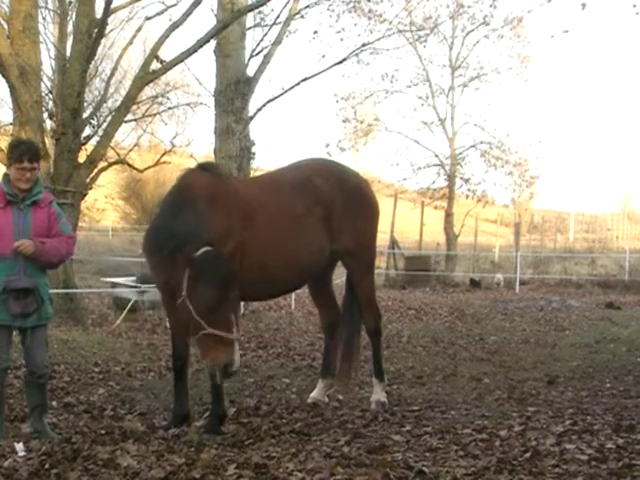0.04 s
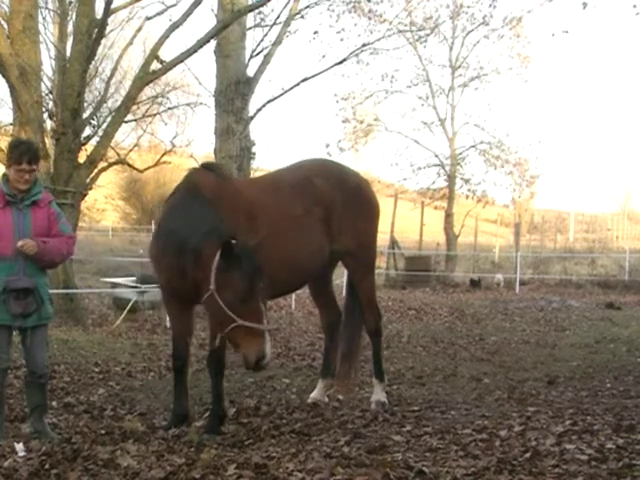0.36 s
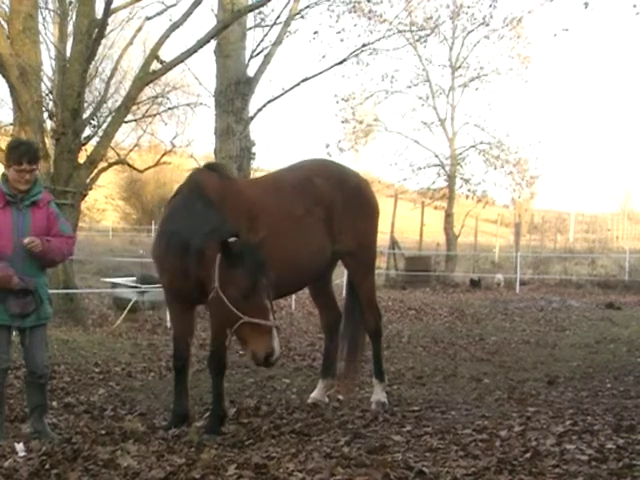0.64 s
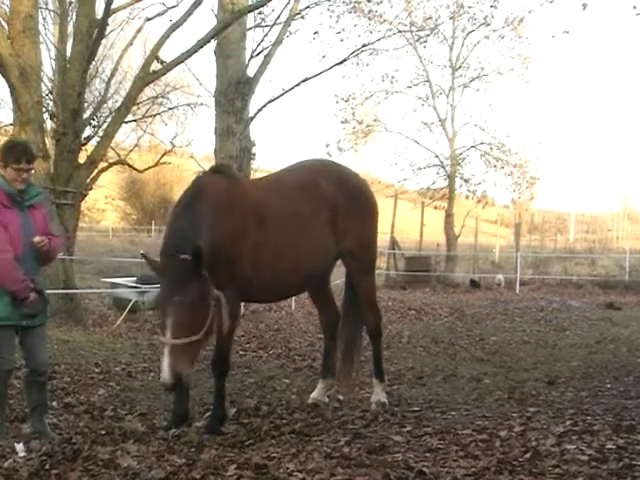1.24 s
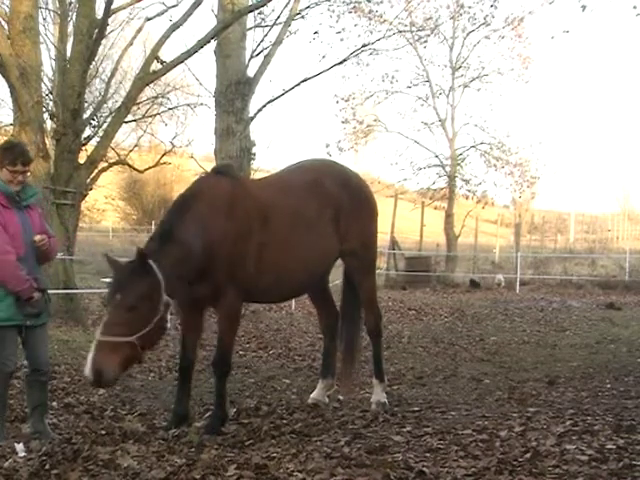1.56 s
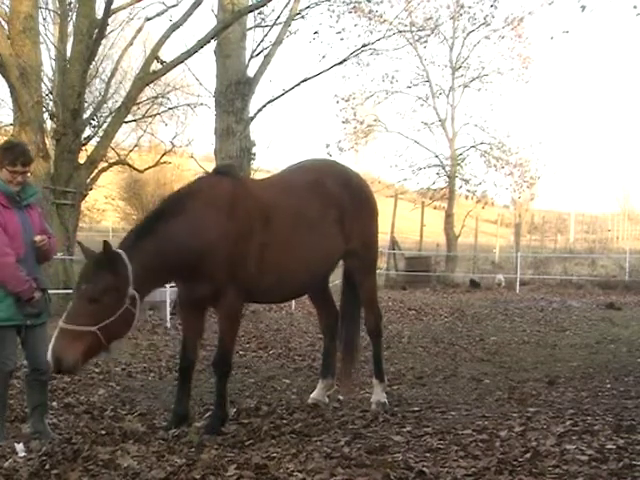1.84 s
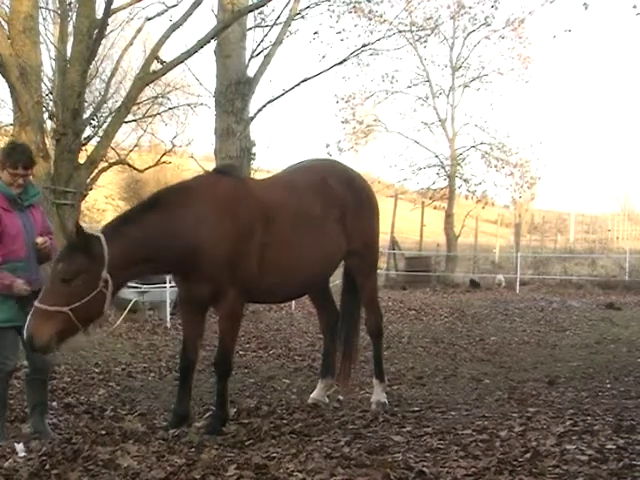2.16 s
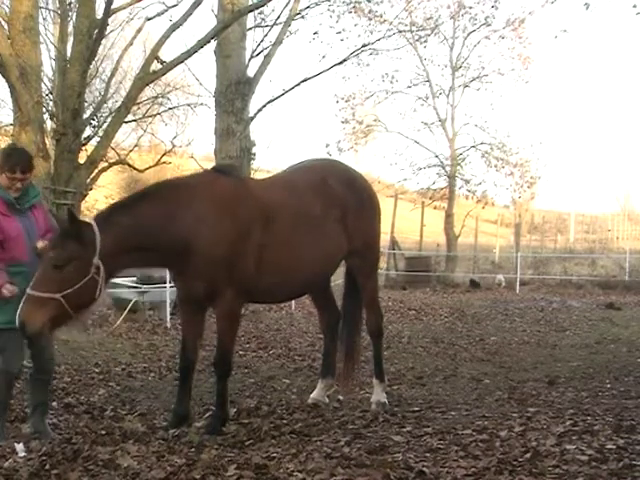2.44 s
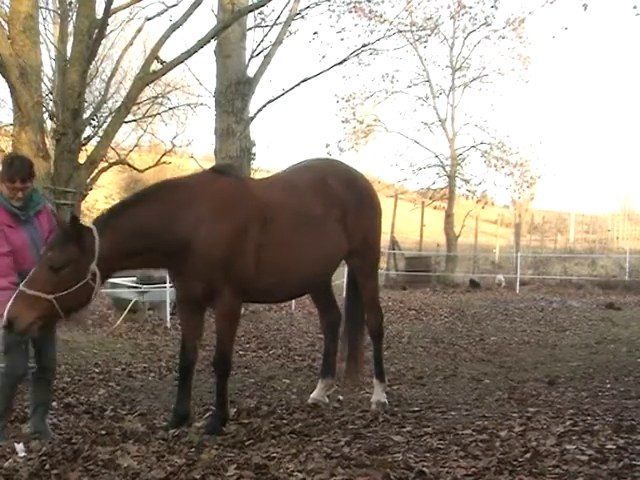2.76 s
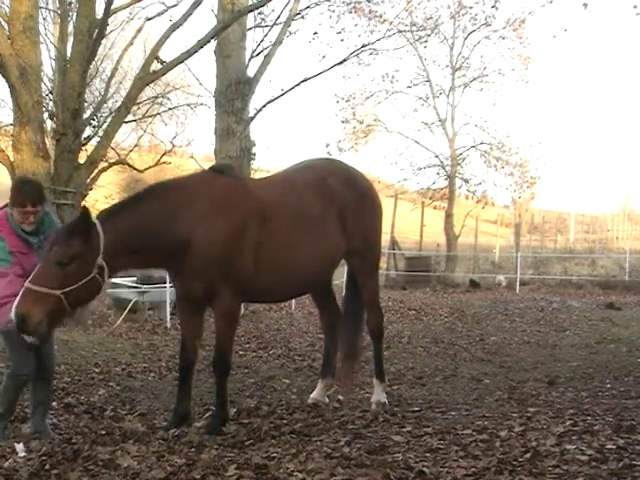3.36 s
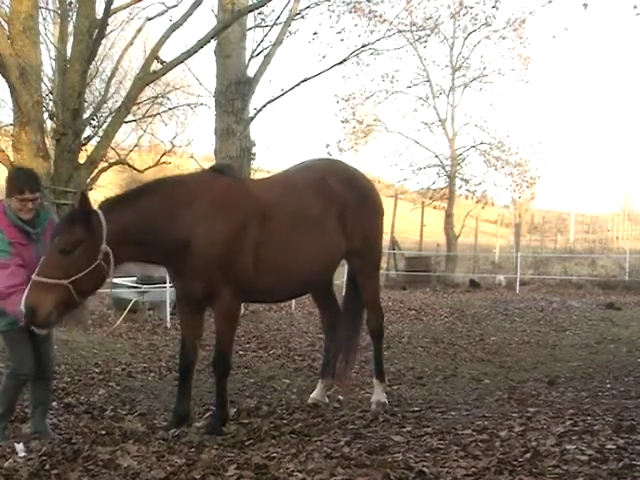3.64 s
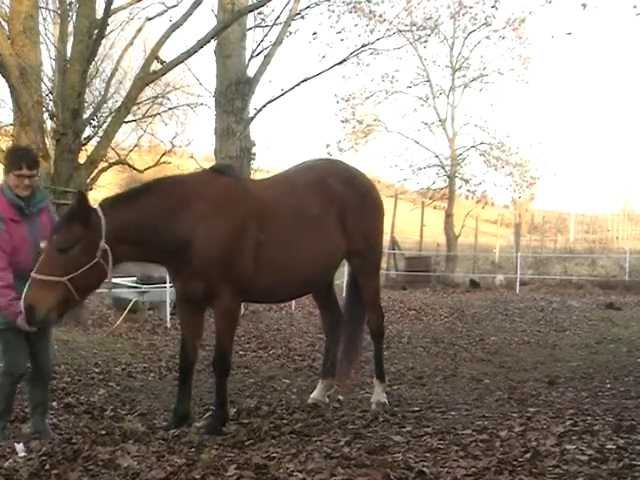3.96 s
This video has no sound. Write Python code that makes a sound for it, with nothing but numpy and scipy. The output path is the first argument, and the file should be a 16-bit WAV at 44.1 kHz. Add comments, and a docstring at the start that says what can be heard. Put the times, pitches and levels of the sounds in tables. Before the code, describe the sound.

A handheld clicker is pressed and released, giving two quick, sharp clicks a few metres from the microphone in an outdoor paddock. Dry leaves rustle softly throughout over a distant wash, with a few faint crackles nearby.

```python
"""Training clicker in a paddock

A clicker is pressed and let go a few metres from the microphone, on leaf-strewn ground.
Its steel tongue snaps twice and rings in a plastic case; ground and trees throw each snap back.
Dry leaves rustle steadily over a distant low wash, and now and then one crackles nearby."""
import sys
import numpy as np
from scipy import signal
from scipy.fft import rfft, irfft
from scipy.io import wavfile
from scipy.ndimage import uniform_filter1d

SR = 44100
rng = np.random.default_rng(int(sys.argv[2]) if len(sys.argv) > 2 else 0)


def waveform_to_disk(signal):
    """Save audio, clipped to [-1, 1], as 16-bit WAV at the path in sys.argv[1]."""
    frames = np.transpose(np.atleast_2d(signal))
    scaled = np.clip(frames, -1, 1) * 32767
    samples = np.round(scaled).astype(np.int16)
    wavfile.write(sys.argv[1], SR, samples)


N = 176400


def clicker():
    """Press and release, a few metres off; so small a case radiates no bass."""
    # the tongue snaps in, then out: t/s, level/dB, state (0 pressed, 1 released)
    snaps = [(0.3505, 0, 0), (0.4946, 0, 1)]
    out = np.zeros((2, N))
    for s, level_db, released in snaps:
        add(out, s, signal.fftconvolve(snap(level_db, released), paddock(), axes=1))
    case_cut_hz = 1450
    return signal.sosfilt(signal.butter(6, case_cut_hz, "high", fs=SR, output="sos"), out)


def snap(level_db, released, size=4096):
    """The tongue buckles and hits its stop: two tiny bursts that crack and ring tongue and case."""
    # modes of tongue and case: f/Hz, level pressed/dB, level released/dB, t60/s
    modes = [(1050, -36, -20, 0.015), (1774, -17.5, -25, 0.013), (2106, -19, -11, .012),
             (2620, -21, -26, .02), (2976, -40, -20, .027), (3827, -23, -27, .036), (4600, -17, -40, .04),
             (4846, -28, -42, .12), (6100, -18, -24.5, 0.023), (6430, -41, -23.5, .026),
             (7060, -19.5, -27, 0.019), (8200, -25, -42, .022), (8733, -28, -28.5, .032),
             (11400, -38, -36, .025)]
    # spectrum of the buckling crack: f/Hz, level pressed/dB, level released/dB
    crack_colour = [(500, -10, -1), (1200, -10, -10.5), (1740, 9, 8), (2500, 2, 7), (3300, -5, 3),
                    (4470, 4.5, -0.5), (7200, 2.5, -3), (10000, -9.5, -9.5), (15500, -14, -16)]
    decay_s, stop_s, crack_db, ring_db = .00059, .0008, 6, -4
    t = np.arange(size) / SR
    column = 2 if released else 1
    bursts = rng.standard_normal((2, size)) * np.exp(-t / decay_s)
    force = bursts[:1].copy()
    add(force, stop_s, bursts[1:])
    force = irfft(np.exp(1j * np.angle(rfft(force)))) * (t < .004)  # spectrum flattened, cut to 4 ms
    crack = colour(force, [(row[0], row[column]) for row in crack_colour])
    body = sum(amp(row[column] - 60 * t / row[3]) * np.sin(2 * np.pi * row[0] * t) for row in modes)
    ring = signal.fftconvolve(force, body[None], axes=1)[:, :size]
    return amp(level_db) * (amp(crack_db) * crack + amp(ring_db) * ring)


def paddock():
    """Paths to the microphone: direct, a dull ground bounce, scatter from litter, trees and trunks."""
    # scatter from the ground nearby, the trees and the nearest trunks: f/Hz, level/dB
    litter = [(500, -3), (2000, -7.5), (4500, 1.5), (9000, 3.5), (15000, 5)]
    trees = [(500, -9), (2000, -12.5), (4500, -8), (9000, -8), (15000, -9)]
    trunks = [(500, -16), (2000, -9.5), (4500, -6.5), (9000, -4.5), (15000, -1)]
    trunk_s, ground_s, ground_db, dull_hz = .0145, .0051, -1.5, 3800
    echoes = scatter(litter, t60=.088, onset_s=.0012) + scatter(trees, t60=.32, onset_s=.012)
    add(echoes, trunk_s, scatter(trunks, t60=.096, onset_s=.001))
    direct = np.zeros_like(echoes)
    direct[:, 0] = 1
    bounce = signal.lfilter(*signal.butter(1, dull_hz, fs=SR), direct)
    add(echoes, ground_s, amp(ground_db) * bounce)
    return (echoes + direct) * amp([[.1], [-.1]])  # a hair to the left


def scatter(spectrum, t60, onset_s):
    """Dense small echoes, different on each side of the microphone."""
    t = np.arange(SR // 2) / SR
    echoes = rng.standard_normal((2, len(t))) * amp(-60 * t / t60) * (1 - np.exp(-t / onset_s))
    return colour(unit(echoes) / np.sqrt(len(t)), spectrum)


def crackles(size=4096):
    """Short clumps of ticks from single dry leaves near the microphone."""
    # single leaves crackling: t/s, level/dB, decay/s
    leaves = [(0.294, -23, 0.00074), (1.1732, -30.5, 0.0098), (1.32, -38, .035), (2.031, -35, .004),
              (2.1182, -31, .005), (2.7325, -34, .004), (2.7715, -32, .002)]
    # spectrum of a crackle: f/Hz, level/dB
    spectrum = [(200, -35), (1300, -16), (2400, -3), (3800, 2.5), (6500, -4.5), (10000, -20), (15500, -30)]
    out, t = np.zeros((2, N)), np.arange(size) / SR
    graininess = .97
    for s, level_db, decay_s in leaves:
        grains = rng.standard_normal((3, size)) * np.exp(graininess * rng.uniform(-2, 2, size))
        clump = unit(colour(grains[2] + .5 * grains[:2], spectrum))
        add(out, s, amp(level_db) * clump * np.exp(-t / decay_s))
    return out


def rustle():
    """Countless leaf ticks, some left, some right, some ahead."""
    # spectrum of a leaf tick: f/Hz, level/dB
    spectrum = [(200, -37), (1300, -14.5), (2400, -9.5), (3600, 1), (6500, -5.5), (10000, -11.5),
                (15500, -22)]
    # rise and fall of the rustle: t/s, level/dB
    swells = [(0, -1), (1.1, -.7), (1.5, -.5), (1.65, 2.2), (1.8, 0), (2.35, -.5), (2.85, 1.5), (3.2, -.5),
              (4, -.5)]
    rustle_db, ticks_per_s, spread_db = -43.8, 1500, 3.2
    sizes = amp(spread_db * np.minimum(rng.exponential(1, (3, N)), 4))
    ticks = sizes * rng.choice([-1, 1], sizes.shape)
    ticks *= rng.random(sizes.shape) < ticks_per_s / SR / len(sizes)
    level_db = rustle_db + np.interp(np.arange(N) / SR, *np.transpose(swells))
    return amp(level_db) * unit(colour(ticks[:2] + ticks[2], spectrum))


def air(size=1024):
    """Distant wash and leaf hiss with faint drifting patches, at two close microphone ports."""
    # wash below, leaf hiss above: f/Hz, level/dB
    spectrum = [(18, -72), (30, -39), (95, -33), (214, -10.5), (482, -5), (733, -4), (1340, -9), (1690, -5),
                (3820, -1), (6610, -3), (10100, -7), (13400, -15), (15700, -24)]
    # drift of the low wash: t/s, level/dB
    wash_drift = [(0, -0.02), (.6, 1.7), (1.3, 0.82), (2.2, -0.29), (4, -0.79)]
    # likeness of the two ports: f/Hz, correlation
    likeness = [(60, 0), (130, 0.97), (640, 0.84), (1410, 0.87), (3100, 0.92), (6820, 0.4), (15000, 0.36)]
    # lead of the left port: f/Hz, phase/rad
    lead = [(100, 0.33), (1640, 0), (3450, 0.75), (7320, 0.48), (15000, 2.14)]
    # balance of the ports: f/Hz, left minus right/dB
    tilt = [(100, .3), (2400, .5), (4400, 1.5), (8100, 1.0), (15000, 3)]
    air_db, patch_db, swell_db, wash_top_hz = -36, .55, .25, 1100
    hop = size // 4
    hz, frames = np.fft.rfftfreq(size, 1 / SR), N // hop + 5
    a, b, c, d, patches = rng.standard_normal((5, frames, len(hz)))
    left, unrelated = a + 1j * b, c + 1j * d
    patches = unit(uniform_filter1d(uniform_filter1d(patches, size=14, axis=0), size=24, axis=1))
    swell = unit(uniform_filter1d(rng.standard_normal(frames), size=35))[:, None]
    same, side_db = read(likeness, hz), read(tilt, hz) / 2
    right = (same * left + np.sqrt(1 - same ** 2) * unrelated) * np.exp(-1j * read(lead, hz))
    drift = np.interp(np.linspace(0, N / SR, frames), *np.transpose(wash_drift))[:, None]
    wash_db = drift / (1 + (hz / wash_top_hz) ** 2)  # the drift fades where leaves take over
    level_db = read(spectrum, hz) + wash_db + patch_db * patches + swell_db * swell
    ports = np.array([left * amp(side_db), right * amp(-side_db)]) * amp(level_db)
    _, sound = signal.istft(ports.swapaxes(1, 2), nperseg=size, noverlap=size - hop)
    return amp(air_db) * unit(sound[:, :N])


def amp(db):
    """Decibels to gain."""
    return 10 ** (np.asarray(db) / 20)


def unit(x):
    """Scales to rms 1."""
    return x / np.sqrt(np.mean(x ** 2) + 1e-20)


def read(points, hz):
    """Reads a table on a log-frequency axis."""
    f, value = np.transpose(points)
    return np.interp(np.log(hz + 1), np.log(f + 1), value)


def add(mix, s, sound):
    """Mixes a sound in at s seconds."""
    part = mix[:, round(s * SR):][:, :sound.shape[1]]
    part += sound[:, :part.shape[1]]


def colour(x, points, size=2048):
    """Minimum-phase filter shaped by rows of f/Hz, level/dB."""
    log_gain = np.log(amp(read(points, abs(np.fft.fftfreq(size, 1 / SR)))))
    taps = np.fft.ifft(np.exp(np.conj(signal.hilbert(log_gain)))).real[:size // 2]
    return signal.fftconvolve(x, taps[None], axes=1)[:, :x.shape[1]]


def scene():
    """The clicker over the sound of the paddock."""
    return clicker() + air() + rustle() + crackles()


def record(dry):
    """The recorder's band limit."""
    edge_hz = 15800
    lowpass = signal.firwin(511, edge_hz, window=("kaiser", 9), fs=SR)
    return signal.oaconvolve(dry, lowpass[None], "same")


dry = scene()
out = record(dry)
waveform_to_disk(out)
```